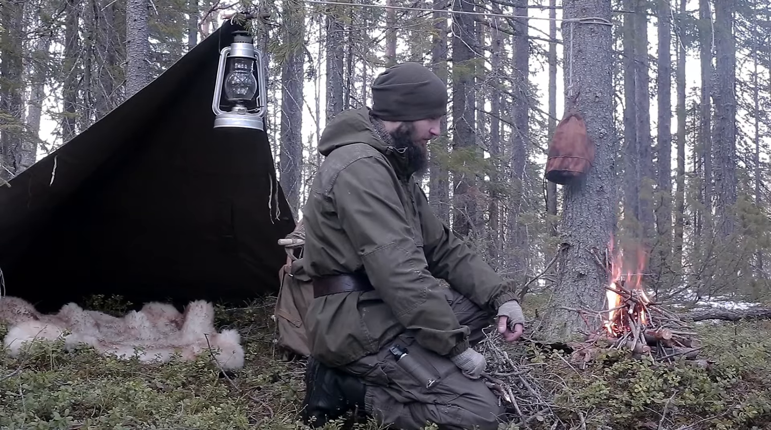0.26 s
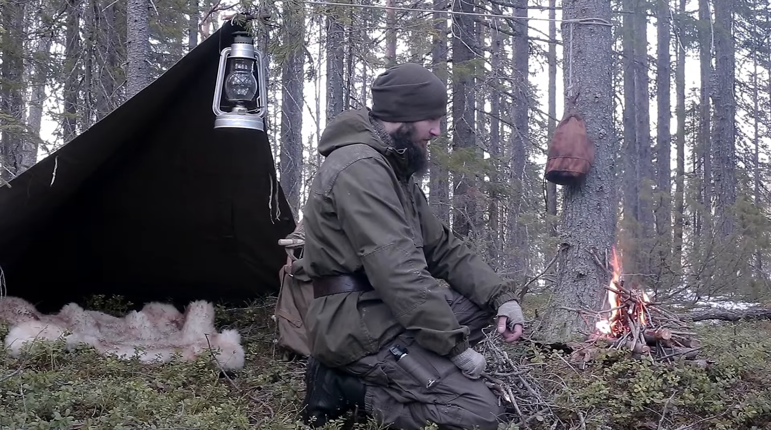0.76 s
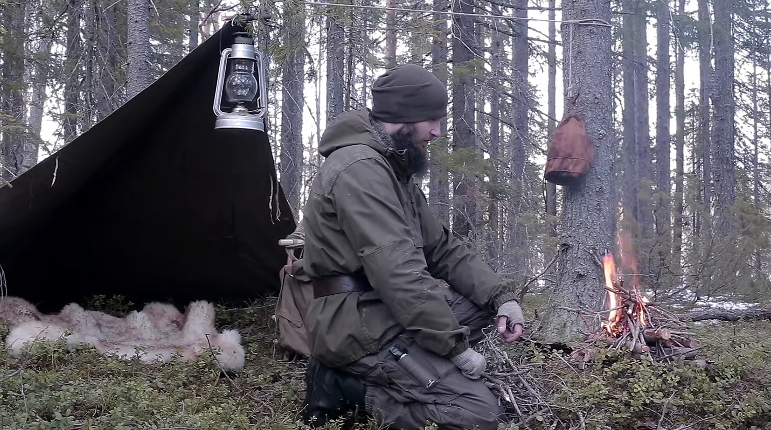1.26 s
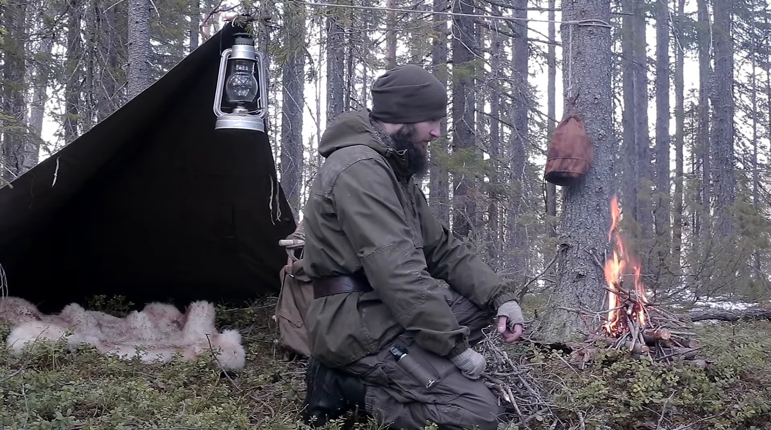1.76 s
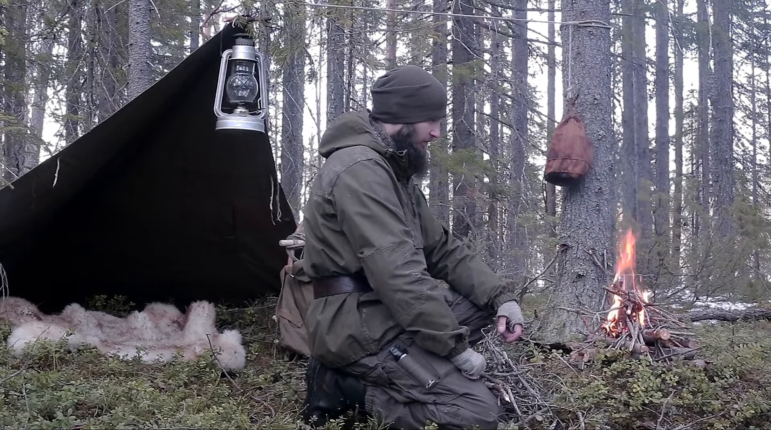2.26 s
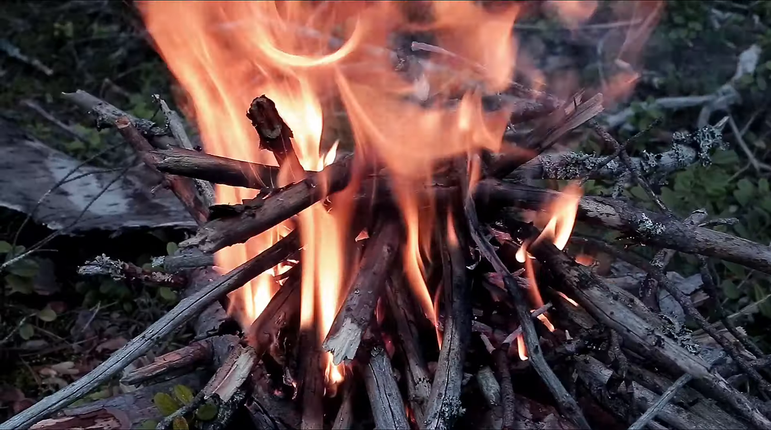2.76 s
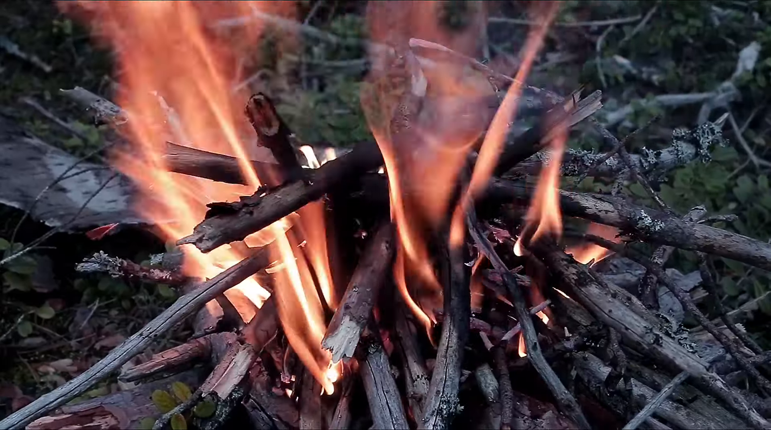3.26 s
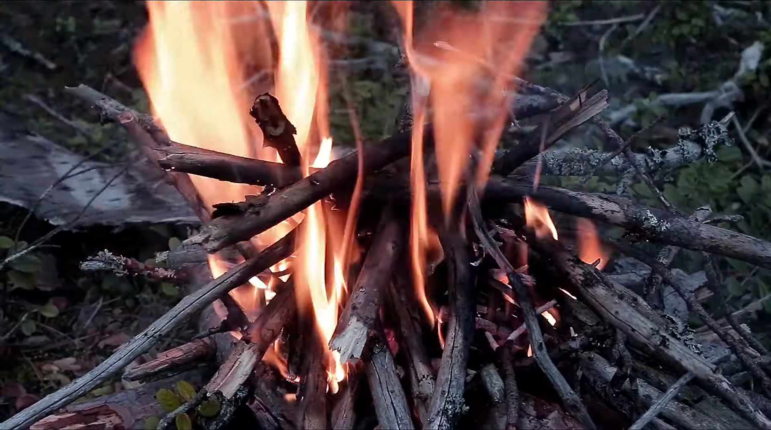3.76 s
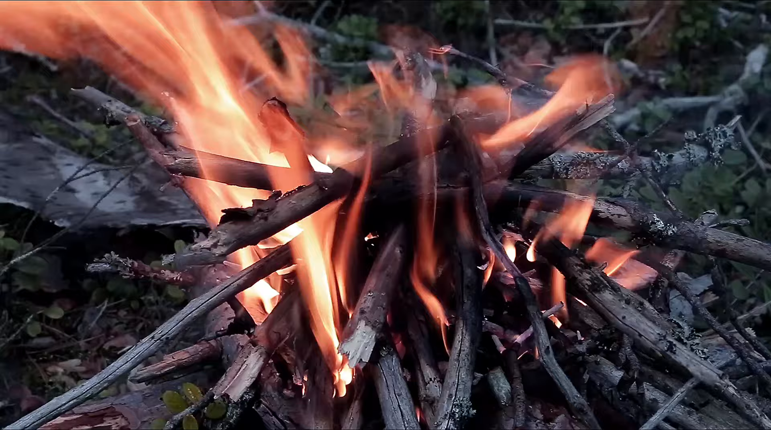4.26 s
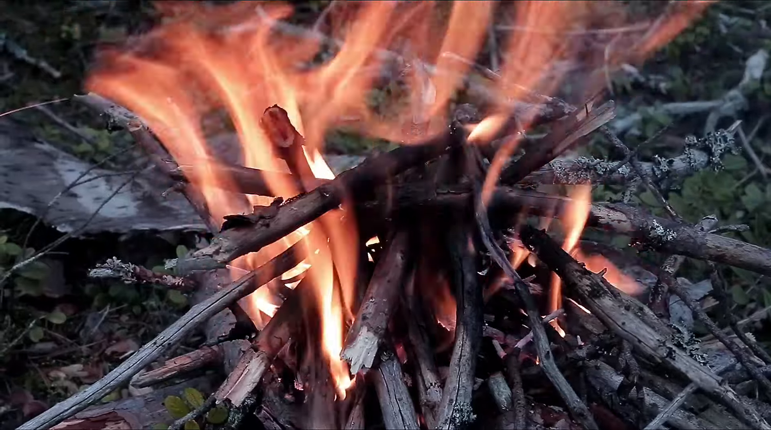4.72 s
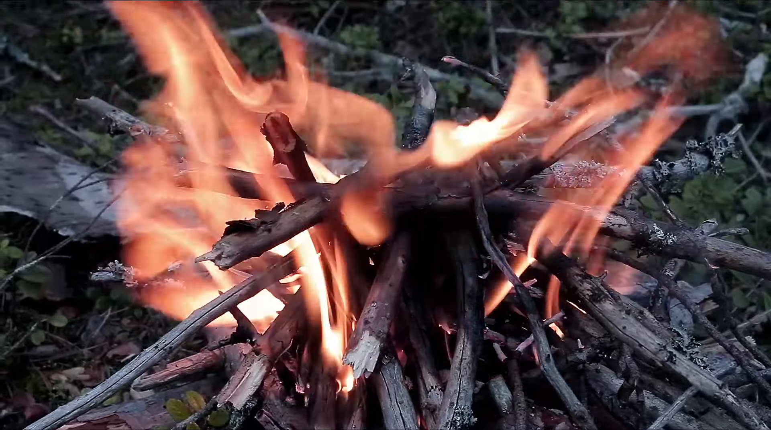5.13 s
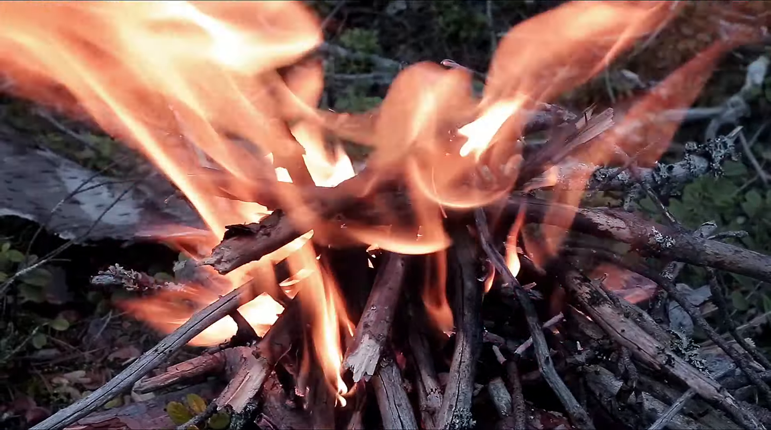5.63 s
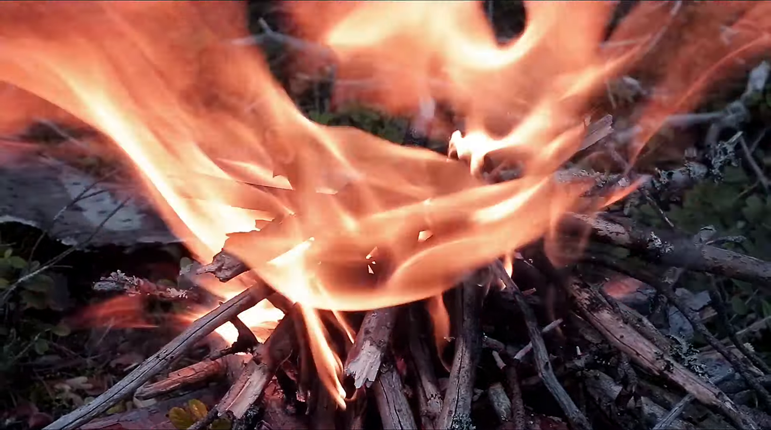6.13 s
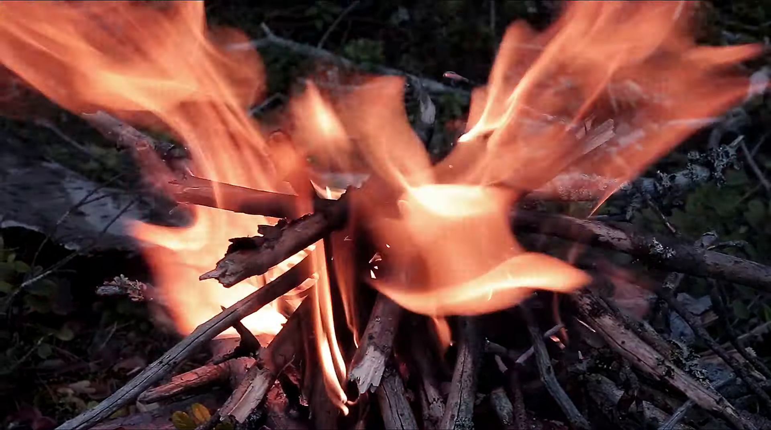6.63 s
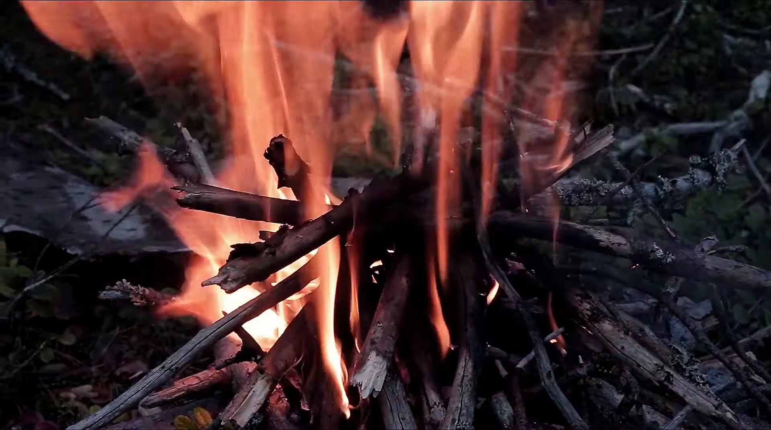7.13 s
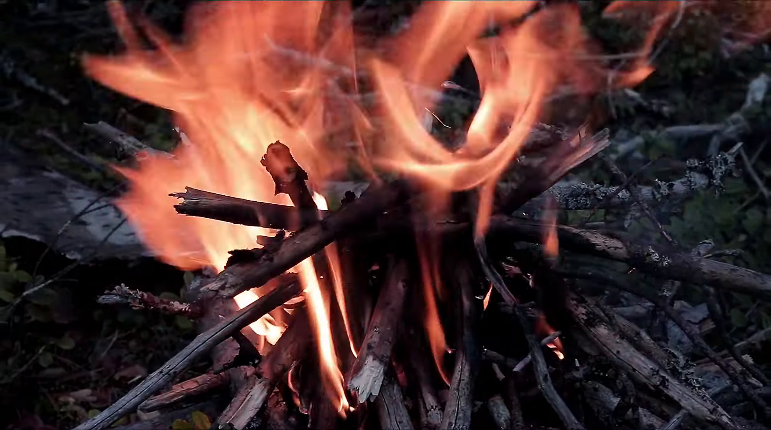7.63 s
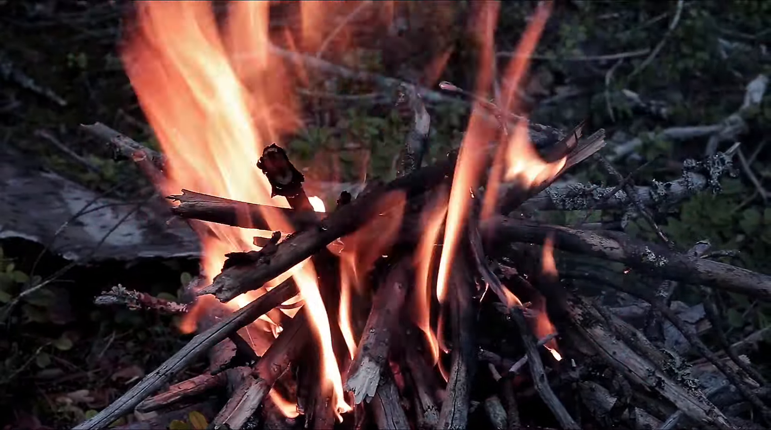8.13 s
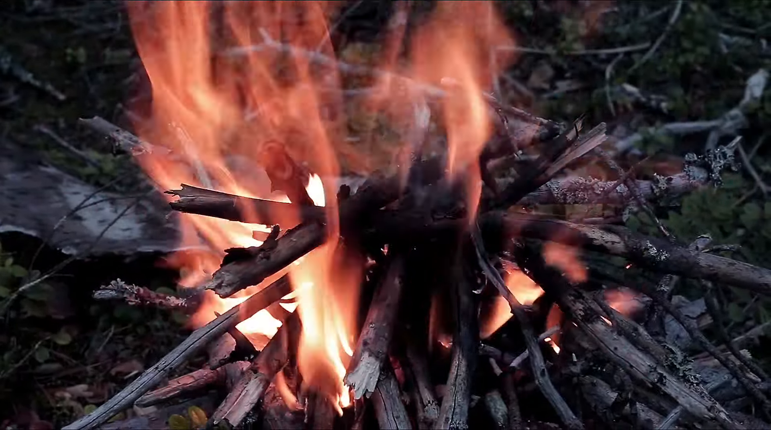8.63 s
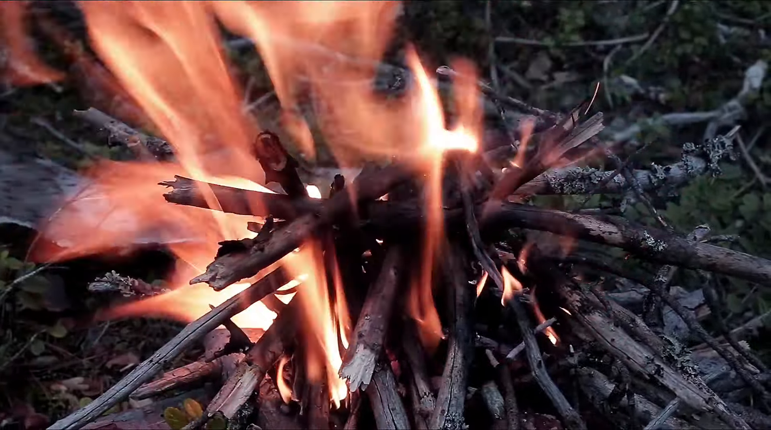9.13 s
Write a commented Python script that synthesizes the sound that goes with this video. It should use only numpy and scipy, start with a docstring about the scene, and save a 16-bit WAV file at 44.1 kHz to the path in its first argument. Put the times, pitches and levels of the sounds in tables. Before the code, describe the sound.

A small fire of dry sticks burns in a quiet forest. It is first heard from a few metres away as light ticks and scattered pops over a faint hush of treetop air. After about two and a half seconds the sound is suddenly close: denser crackle, sharp snaps, tiny sizzles and a soft low roar of flames that flutter and puff. Two loud snaps come near the end.

```python
"""A small fire of dry sticks in a forest, on one microphone: from a few metres, then close by.
Sap pockets burst as sharp pops over a fine crackle; steam sizzles out of wet ones, sap whistles from cracks.
Gas ignites in soft puffs. Close up, the flames roar and flutter as tongues tear off.
Air in the tree tops gives a steady hush behind it."""
import sys
import numpy as np
from scipy import signal
from scipy.fft import rfft, irfft, next_fast_len
from scipy.io import wavfile
from scipy.ndimage import uniform_filter1d, map_coordinates

SR = 44100
rng = np.random.default_rng(int(sys.argv[2]) if len(sys.argv) > 2 else 0)


def waveform_to_disk(signal):
    """Save audio, clipped to [-1, 1], as 16-bit WAV at the path in sys.argv[1]."""
    frames = np.transpose(np.atleast_2d(signal))
    scaled = np.clip(frames, -1, 1) * 32767
    samples = np.round(scaled).astype(np.int16)
    wavfile.write(sys.argv[1], SR, samples)


N = 413216
CLOSE_S = 2.405  # close perspective from here on

# pop colour through the microphone windshield: f/Hz, gain/dB
POP_COLOUR = [(100, 5), (400, 13), (1400, 18), (2350, 11.5), (3100, 13.5), (3950, 16.5), (4420, 12.5),
              (5100, 14.5), (5900, 4.5), (6900, 9.5), (10400, 4.5), (12500, 1), (15000, -6.5)]


def amp(db):
    return 10 ** (np.asarray(db) / 20)


def unit(x):
    return x / np.sqrt(np.mean(x ** 2) + 1e-20)


def wobble(rate_hz):
    """Smooth random curve, rate_hz knots a second."""
    knots = rng.standard_normal(int(N * rate_hz / SR) + 4)
    return map_coordinates(knots, [np.arange(N) * rate_hz / SR])


def filtered(x, response):
    """Apply a complex response(hz) along the last axis."""
    n = x.shape[-1]
    padded = next_fast_len(n + 4096)
    return irfft(rfft(x, padded) * response(np.fft.rfftfreq(padded, 1 / SR)), padded)[..., :n]


def noise(spectrum, channels=1):
    """Noise of rms 1, shaped by (f/Hz, level/dB) points on a log axis."""
    points_hz, db = np.transpose(spectrum)
    white = rng.standard_normal((channels, N))
    return unit(filtered(white, lambda hz: amp(np.interp(np.log(hz + 1), np.log(points_hz), db))))


def placed(times_s, rows):
    """Sum short sounds, one a row, at their start times."""
    at = np.round(np.asarray(times_s) * SR).astype(int)[:, None] + np.arange(rows.shape[1])
    return np.bincount(at.ravel(), rows.ravel(), N + SR)[:N]


def pop_coloured(rows, bass_db=0, treble_db=0):
    """Minimum-phase filter per row: POP_COLOUR plus shelves at 1.5 and 6 kHz."""
    hz = np.fft.rfftfreq(1024, 1 / SR)
    shelves_db = np.outer(bass_db, 1 / (1 + (hz / 1500) ** 4))
    shelves_db += np.outer(treble_db, 1 - 1 / (1 + (hz / 6000) ** 6))
    cepstrum = irfft(np.log(amp(np.interp(hz, *np.transpose(POP_COLOUR)) + shelves_db)))
    half = cepstrum.shape[1] // 2
    cepstrum[:, 1:half] *= 2  # fold onto positive time
    cepstrum[:, half + 1:] = 0
    impulse = irfft(np.exp(rfft(cepstrum)))[:, :half]
    return signal.fftconvolve(rows, impulse, axes=1)[:, :rows.shape[1]]


def forest():
    """Hush of air in the tree tops, slightly lower close to the fire."""
    spectrum = [(15, -34), (30, -1.5), (100, -0.5), (350, -1), (620, 0), (1250, -6), (1480, -6),
                (1700, -13.5), (2600, -14.5), (7000, -19.5), (15000, -27)]  # tree-top hush: f/Hz, relative density/dB
    close_db = np.where(np.arange(N) > CLOSE_S * SR, -1.5, 0)
    return amp(-56 + close_db + 0.55 * wobble(3.43)) * noise(spectrum)[0]


def whistles():
    """Sap whistles out of a crack: thin tones that waver as they die."""
    tones = [(3.33, 2520, -63, 1.6), (3.366, 2520, -46, .03), (5.269, 3200, -33, .03)]  # sap whistles: t/s, f/Hz, level/dB, t60/s
    t = np.arange(N) / SR
    wavering_s = np.cumsum(1 + 0.0083 * wobble(30)) / SR
    return sum(amp(db - 60 * np.abs(t - start_s) / t60_s) * (t > start_s)
               * np.sin(2 * np.pi * hz * wavering_s) for start_s, hz, db, t60_s in tones)


def sizzles(size=5000):
    """Steam leaves wet pockets in uneven spits and dies away."""
    wet_pockets = [(0.174, -56, 0.046), (0.305, -51, 0.068), (1.059, -54, .05), (1.21, -46, 0.1),
                   (1.344, -47, 0.094), (1.494, -60, 0.046), (3.277, -37, 0.073), (4.43, -37, 0.073),
                   (4.684, -47, .04), (4.897, -43, 0.082), (5.48, -50, 0.06), (5.73, -48, .05),
                   (6.059, -39, 0.081), (6.57, -45, 0.076), (7.605, -41, 0.055), (7.712, -52, 0.066),
                   (8.201, -43.5, 0.21), (8.949, -41, 0.069)]  # t/s, level/dB, t60/s (capped below)
    times_s, db, t60_s = np.transpose(wet_pockets)[..., None]
    white = rng.standard_normal((len(db), 2, size))
    spits = amp(39 * uniform_filter1d(white[:, 1], size=50))
    steam = unit(pop_coloured(white[:, 0] * spits))
    envelope = amp(db - 60 * np.arange(size) / SR / np.clip(t60_s, .01, .2))
    return placed(times_s[:, 0], steam * envelope)


def puffs(small_count=70, typical_s=0.013, size=4410):
    """Gas ignites: one push of air inside a swell of dull turbulence; slower is deeper."""
    large = [(0.278, -50, 0.0087), (0.314, -47, 0.014), (0.708, -46, 0.027), (1.061, -43.5, 0.014),
             (2.412, -35, 0.014), (2.947, -40.5, 0.012), (3.006, -38.5, 0.012), (3.03, -42, 0.038),
             (3.126, -38, 0.012), (3.199, -39, 0.053), (3.297, -37.5, 0.012), (3.399, -37, 0.018),
             (3.436, -41.5, 0.014), (3.475, -36.5, 0.038), (3.68, -36, 0.031), (3.882, -36.5, 0.067),
             (4.2, -31.5, 0.021), (4.349, -38.5, 0.014), (4.404, -38.5, 0.057), (4.497, -33, 0.013),
             (4.641, -29, 0.0083), (4.691, -42, 0.014), (4.935, -41.5, 0.069), (5.069, -32, 0.02),
             (5.565, -38, 0.015), (5.732, -28.5, 0.015), (5.81, -41.5, 0.079), (6.178, -40.5, 0.047),
             (6.397, -35.5, 0.0074), (6.538, -44.5, 0.02), (6.69, -44, 0.018), (7.0, -45, 0.0093),
             (7.704, -38, 0.043), (7.761, -36.5, 0.11), (8.057, -42, 0.0087), (8.203, -38, 0.014),
             (8.45, -36.5, 0.0092), (8.521, -27, 0.0058), (8.643, -39, 0.014), (9.076, -46, 0.063),
             (9.204, -40.5, 0.024)]  # large gas pockets: crest t/s, level/dB, nominal length/s
    when, strength, stretch = rng.random((small_count, 3)).T
    small = np.transpose([CLOSE_S + when * (N / SR - CLOSE_S),
                          -44.5 + 10 * (strength - .5),
                          typical_s * (0.42 + stretch ** 2)])
    crest_s, db, length_s = np.vstack([large, small]).T[..., None]
    centre_hz = 258 * (typical_s / length_s) ** 0.37
    t = (np.arange(size) - size / 2) / SR
    swell = np.exp(-2.8 * (t / np.clip(length_s, .005, .06)) ** 2)
    gas = rng.standard_normal((len(db), size))
    gas[:, size // 2 - 30] += 25  # the push
    lump = swell * filtered(gas, lambda hz: 1j * hz / (0.53 * centre_hz + 1j * hz)
                            / (1 + 1j * hz / (0.54 * centre_hz)) / (1 + 1j * hz / 900))
    lump *= np.linalg.norm(swell, axis=1, keepdims=True) / np.linalg.norm(lump, axis=1, keepdims=True)
    return placed(crest_s[:, 0] - size / 2 / SR, lump * amp(db))


def flames(far_crackle_db=-62.5):
    """Roar and flutter surge as tongues of flame tear off, with crackle; from afar only faint ticks."""
    heat = [(2.41, -57, -48, -53), (2.6, -49, -49.5, -53), (3.2, -53, -46.5, -54), (3.4, -51, -49, -59.5),
            (3.75, -50, -41, -53), (4.02, -56, -59.5, -54), (4.25, -51, -55, -60.5),
            (4.91, -47.5, -45.5, -53.5), (6.09, -53.5, -49, -55), (6.42, -51.5, -51.5, -53),
            (6.83, -51, -51, -55), (7.18, -50, -52.5, -54.5), (7.43, -55.5, -49.5, -52),
            (8.5, -50, -48, -54), (8.63, -55, -56, -51), (8.9, -54, -51.5, -58.5), (9.12, -48, -41, -53),
            (9.37, -49, -54.5, -64)]  # close flames: t/s, roar/dB, flutter/dB, crackle/dB
    roar_spectrum = [(15, -14), (28, 6.5), (70, 5.5), (130, -2), (250, -38)]  # deep roar: f/Hz, relative density/dB
    flutter_spectrum = [(50, -13), (110, 2), (260, -4), (450, -6.5), (1250, -21.5), (1600, -23),
                        (2600, -41), (6000, -45)]  # flame flutter: f/Hz, relative density/dB
    times_s, *levels_db = np.transpose(heat)
    t = np.arange(N) / SR
    roar_db, flutter_db, crackle_db = [np.interp(t, times_s, db) for db in levels_db]
    tearing = wobble(14)
    roar = amp(roar_db) * unit(noise(roar_spectrum)[0] * amp(1.5 * tearing))
    flutter = amp(flutter_db) * unit(noise(flutter_spectrum)[0] * amp(2.6 * tearing + 3.6 * wobble(90)))
    close = t > CLOSE_S
    return (roar + flutter) * close + crackle(np.where(close, crackle_db, far_crackle_db))


def bursts(times_s, db, bass_db, treble_db, sputter_db, size=2600):
    """A pocket bursts: pressure pulse, splinters, sputtering steam, scatter from the trunks."""
    t = np.arange(size) / SR
    splinters, flow, steam, scatter = rng.standard_normal((len(times_s), 4, size)).swapaxes(0, 1)
    burst = .27 * splinters * amp(-60 * t / .006)
    burst[:, 0] -= 1.4  # pressure pulse
    spits = amp(40 * uniform_filter1d(flow, size=50))
    sputter = 0.18 * steam * spits * amp(-60 * t / 0.053) * (t > .002)
    burst += amp(np.minimum(sputter_db, -2))[:, None] * sputter
    scatter_db = np.where(times_s < CLOSE_S, -37, -54)[:, None]  # relatively louder from afar
    burst += scatter * amp(scatter_db - 60 * t / .13)
    burst = pop_coloured(burst, bass_db, treble_db)
    # db sets the attack: 1.5-6 kHz energy of the first 3 ms, as rms over 2 ms
    band = signal.butter(2, [1500, 6000], "band", fs=SR, output="sos")
    attack = signal.sosfilt(band, burst[:, :round(SR * .003)])
    attack_rms = np.linalg.norm(attack, axis=1) / np.sqrt(SR * .002)
    return placed(times_s, burst * (amp(db) / attack_rms)[:, None])


def crackle(floor_db, count=330):
    """Tiny pops in loose clusters, mostly faint and dull; their levels follow the floor_db curve."""
    when, rarity, bass, treble = rng.random((count, 4)).T
    activity = np.cumsum(amp(5 * wobble(12)))
    at = np.searchsorted(activity, when * activity[-1])
    db = floor_db[at] - 2.6 * np.log(rarity + 1 / count)
    return bursts(at / SR, db, bass_db=4 + 22 * (bass - .5), treble_db=-9 + 18 * (treble - .5),
                  sputter_db=np.full(count, -14.), size=700)


def pops(typical_db=-35):
    """Sap pockets burst; a violent one empties at once and sputters less."""
    sap_pockets = [(0.1194, -53, 8, -2), (0.172, -41.5, 6.5, -14), (0.223, -39.5, -9, -12),
                   (0.2735, -40.5, 1, 2), (0.302, -42.5, 7, 0), (0.3557, -50, -6, 2), (0.3906, -34, -3, -9),
                   (0.5503, -54, 6, -6), (0.6976, -43.5, -3, -2), (1.057, -43, 2, 0),
                   (1.123, -31, -1.5, -11), (1.2028, -35.5, -5, -8), (1.2133, -44, -12, -9),
                   (1.3397, -31, -17, 10.5), (1.473, -52, -4, -7), (1.4905, -24.5, -6, -7),
                   (1.6622, -43, -10, 6), (1.7273, -29.5, -3.5, 7.5), (1.7599, -29.5, -10.5, 4.5),
                   (2.0191, -43.5, 5, -6), (2.0923, -52, 7, 5), (2.2928, -50, 3, -3), (2.355, -50, -7, -7),
                   (2.3876, -37.5, -1, 3.5), (2.4083, -41.5, -18, -5), (2.565, -23.5, -7.5, -22.5),
                   (2.6022, -39.5, 4, -18), (2.6193, -31, 4, -10), (2.6777, -43, -3, 3),
                   (2.6836, -39, -1, -3), (2.702, -24.5, -8, -2), (2.725, -35, 15, -9),
                   (2.775, -31.5, 7.5, -5), (2.859, -28.5, -10, -14), (2.8803, -44, 6, -7),
                   (2.9566, -45, 5, -4), (3.0341, -44, 1, -1), (3.076, -41, 1, -9), (3.101, -35, -1, 4.5),
                   (3.156, -38, 18, -14), (3.193, -27.5, 3.5, -5), (3.247, -43, 13, -5),
                   (3.2733, -16, 3, -13), (3.2886, -33, 2, 3.5), (3.3664, -37.5, -7, 9),
                   (3.4573, -43.5, -12, 0.5), (3.5969, -30.5, 12.5, 0.5), (3.6204, -46, -2, -12),
                   (3.845, -40.5, 11, 3), (3.8535, -23, -1.5, -14.5), (3.8974, -39, -17, -3),
                   (3.9558, -24.5, -4, -9), (4.0104, -27.5, 4.5, 0.5), (4.0596, -38, 4, 5),
                   (4.1011, -40.5, -3, -3), (4.1524, -35, 4, 1), (4.191, -38.5, 27, 12),
                   (4.3664, -42, -3, 2), (4.381, -22.5, -3.5, 0.5), (4.395, -27, 8, -10),
                   (4.4286, -28.5, -4, -2), (4.5143, -46.5, -5, 12), (4.5879, -38, 3, 1),
                   (4.6379, -32.5, 8, 9), (4.6815, -37, 2, -4), (4.808, -27, -2, 2.5),
                   (4.851, -42.5, -9, -1), (4.8946, -37, 17, -3), (5.0196, -26.5, 14.5, 0.5),
                   (5.062, -32, 11, 5), (5.0729, -37, -1, 3), (5.0888, -31, 21, -8), (5.21, -39.5, 9, -1),
                   (5.26, -30.5, 3.5, 6.5), (5.2696, -38, -12, -18), (5.4458, -43, 11, -1),
                   (5.4757, -36.5, 1, 5), (5.527, -41, 13, 4), (5.5416, -33, -1, 4), (5.615, -45, 3, 2),
                   (5.707, -52, -1, -13), (5.7263, -29.5, 10, -2), (5.769, -42.5, 15, 2),
                   (5.8047, -45, 0, 9), (5.8367, -22, 0, -1.5), (6.0064, -41, -6, -11),
                   (6.0223, -37, -1, -16), (6.0573, -24.5, 7, 1), (6.0782, -44, 6, -10),
                   (6.0907, -44, -5, -12), (6.3267, -36, -4, 6), (6.3386, -31, 8, 8),
                   (6.393, -43.5, 16, -20), (6.4464, -33, 12, -0.5), (6.5666, -30.5, 4, 6.5),
                   (6.5956, -41, 13, -5), (6.6098, -43, 6, -5), (6.8543, -32, -4, -8),
                   (6.8858, -46, -10, 10), (6.9899, -44, 15, 2), (7.059, -33, 8, 3), (7.1136, -39, -22, 4),
                   (7.141, -43, 3, 6), (7.3179, -34, 4.5, -6), (7.533, -44, -3, -9), (7.5525, -36, 6, -8),
                   (7.603, -25, -1.5, -10), (7.628, -39.5, 8, -9), (7.7074, -27.5, 3, -3.5),
                   (7.7261, -41, -13, -7), (7.7555, -34, -32, -11), (7.8085, -40, 4, -1),
                   (7.8975, -20, 1.5, -10.5), (7.9338, -40.5, -2, -2), (7.989, -38, -4, -3.5),
                   (8.0287, -32, 2, -25), (8.0531, -30, 14, -5), (8.1998, -27.5, 11, 1),
                   (8.206, -38.5, -15, -8), (8.2158, -35.5, 5, 4), (8.2839, -45, 5, -8),
                   (8.5189, -21, 18.5, 2), (8.6155, -33, -8, -10), (8.6196, -8.5, 1, -2),
                   (8.663, -42, -3, -16), (8.6763, -30, 2, -15), (8.704, -27.5, -13, 4.5),
                   (8.7496, -39.5, 0, 7), (8.894, -43, 2, 6), (8.947, -28.5, 8, -22), (8.9568, -24.5, 5, 2),
                   (9.0725, -38, -6, -9), (9.091, -20, -13.5, -10.5), (9.1167, -42, -3, 5),
                   (9.1439, -19.5, -1.5, -8.5), (9.2219, -32.5, 5, -7.5), (9.226, -35, -2, -3),
                   (9.2332, -33, -7, -17), (9.3144, -8.5, -2, 2), (9.343, -42, 2, -1)]  # t/s, attack level/dB, bass shelf/dB, treble shelf/dB
    times_s, db, bass_db, treble_db = np.transpose(sap_pockets)
    sputter_db = -18 - .95 * (db - typical_db) + 3 * rng.standard_normal(len(db))
    return bursts(times_s, db, bass_db, treble_db, sputter_db)


def scene():
    """Fire and forest, the same in both channels."""
    return np.tile(pops() + sizzles() + puffs() + whistles() + flames() + forest(), (2, 1))


def record(dry, ceiling=.5, hiss_db=-67, rolloff_hz=15400, cutoff_hz=16600):
    """The microphone rounds the peaks; each channel adds its own hiss; the top rolls off, then ends."""
    hiss_spectrum = [(20, 4), (120, -5), (500, -1.5), (1500, -7), (4000, -1), (14800, 5), (16500, -12)]  # channel hiss: f/Hz, relative density/dB
    rounded = dry / (1 + np.abs(dry / ceiling) ** 6) ** (1 / 6)
    noisy = rounded + amp(hiss_db) * noise(hiss_spectrum, channels=2)
    return filtered(noisy, lambda hz: (hz < cutoff_hz) / np.sqrt(1 + (hz / rolloff_hz) ** 40))


dry = scene()
out = record(dry)
waveform_to_disk(out)
```